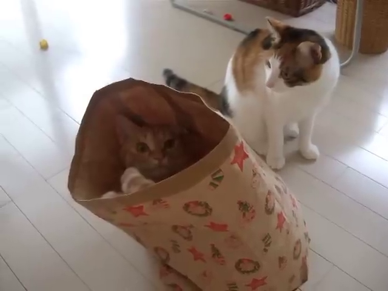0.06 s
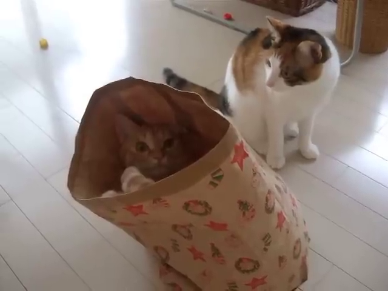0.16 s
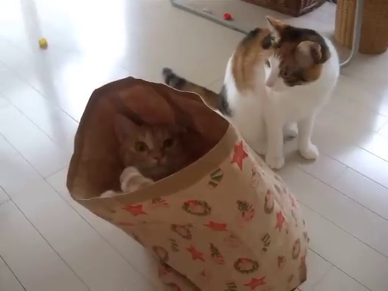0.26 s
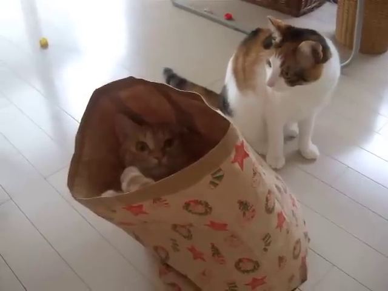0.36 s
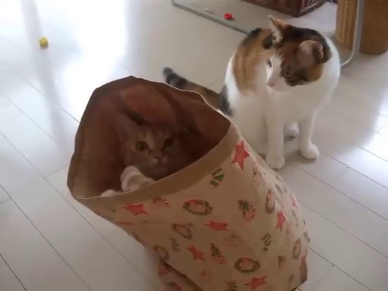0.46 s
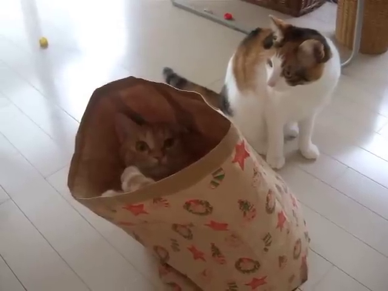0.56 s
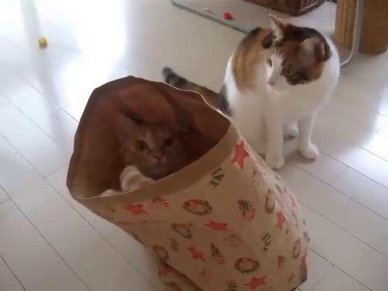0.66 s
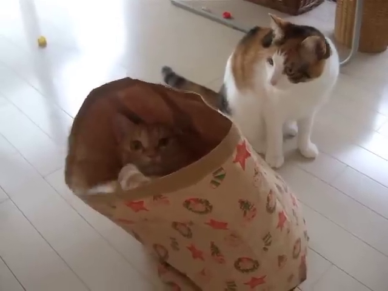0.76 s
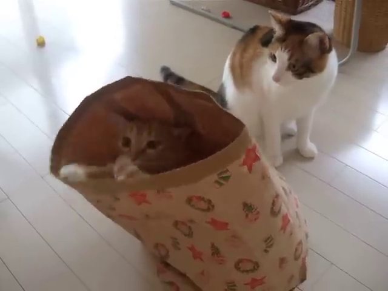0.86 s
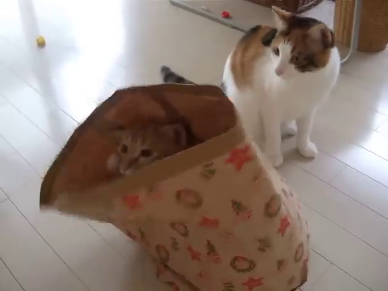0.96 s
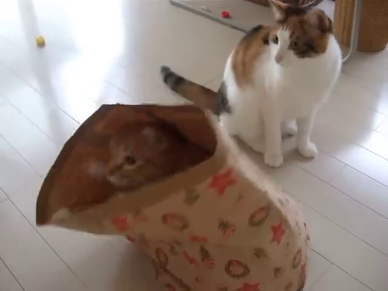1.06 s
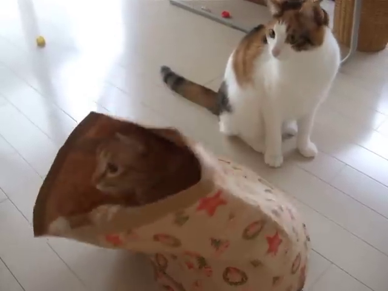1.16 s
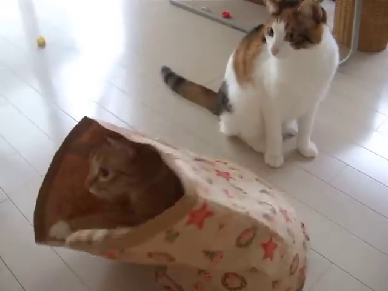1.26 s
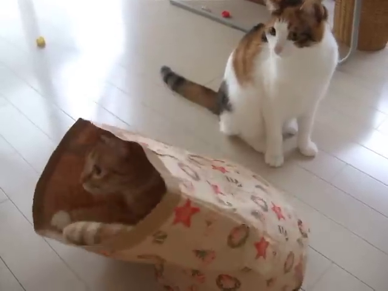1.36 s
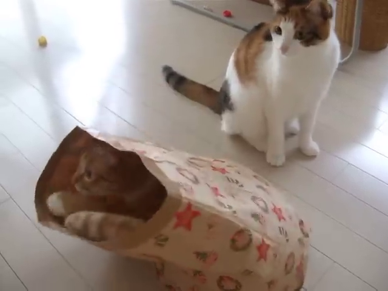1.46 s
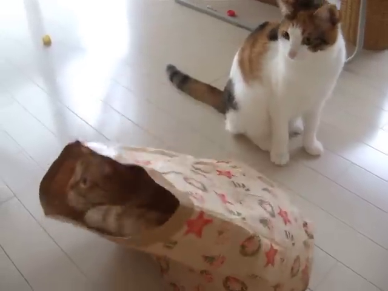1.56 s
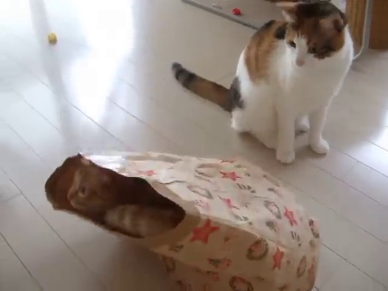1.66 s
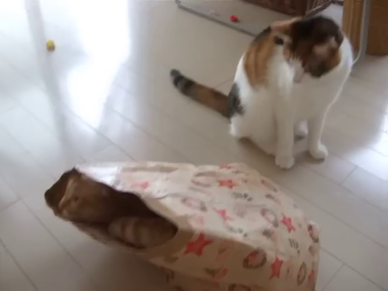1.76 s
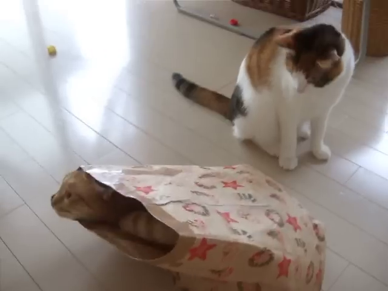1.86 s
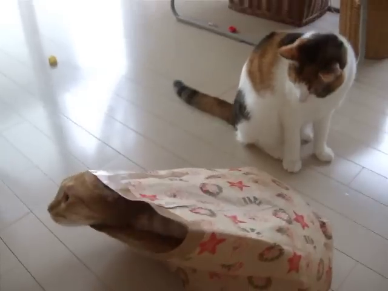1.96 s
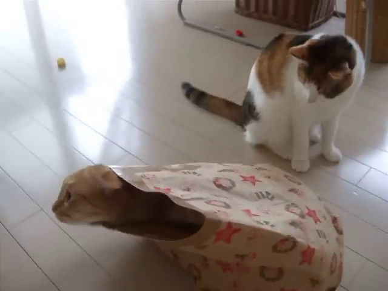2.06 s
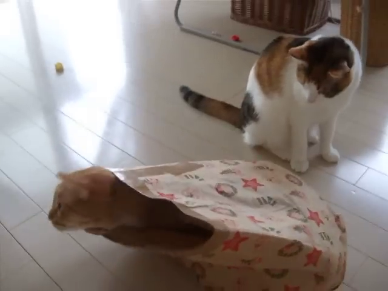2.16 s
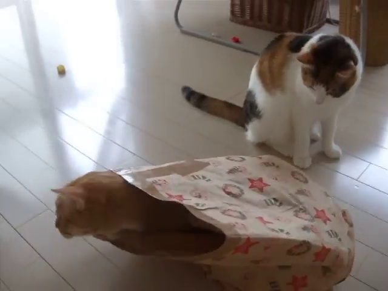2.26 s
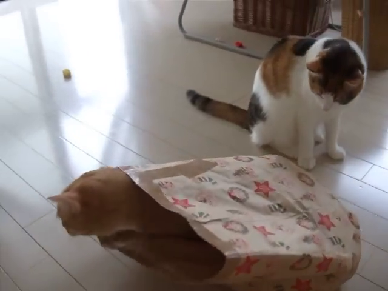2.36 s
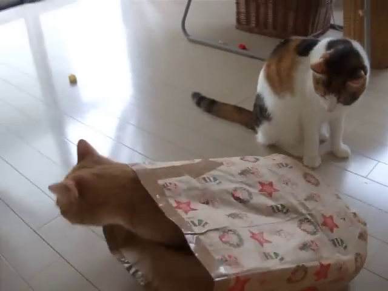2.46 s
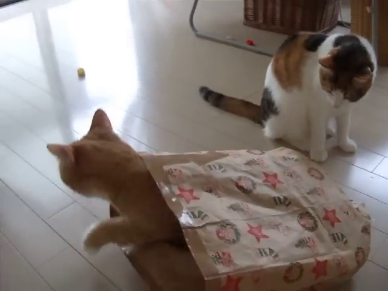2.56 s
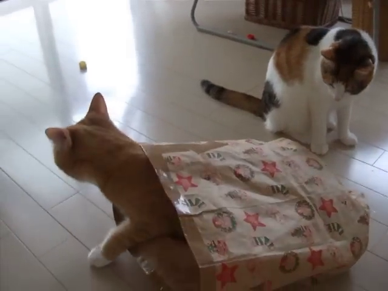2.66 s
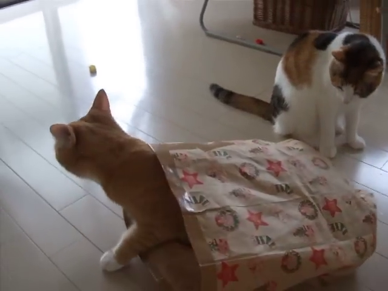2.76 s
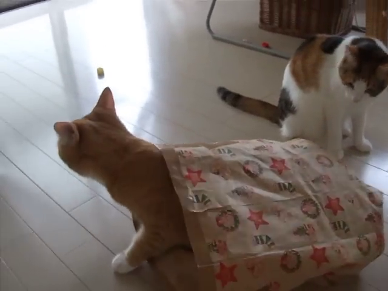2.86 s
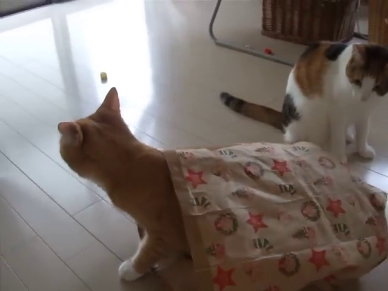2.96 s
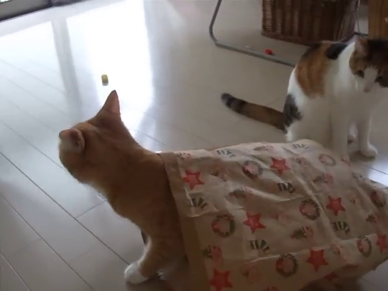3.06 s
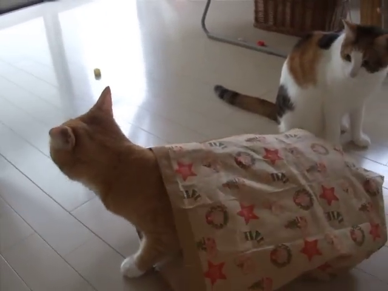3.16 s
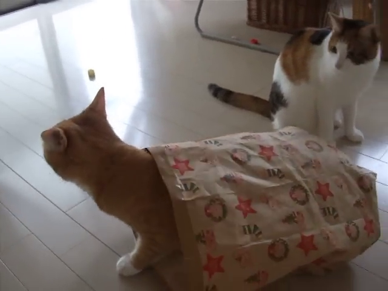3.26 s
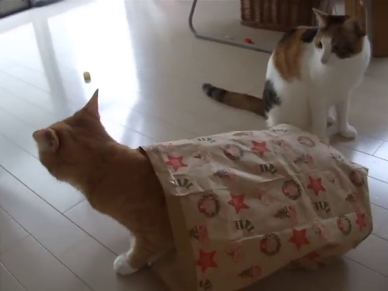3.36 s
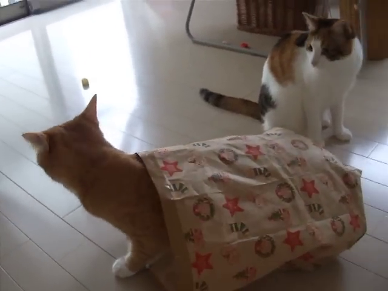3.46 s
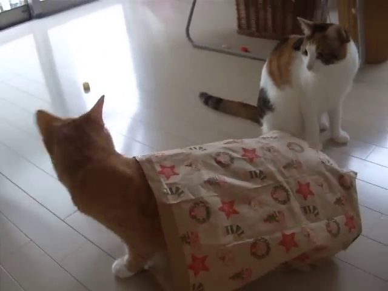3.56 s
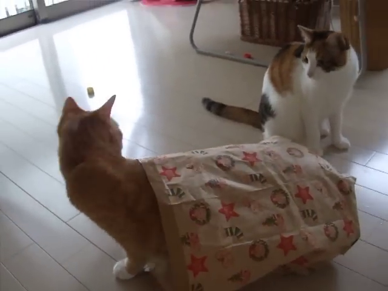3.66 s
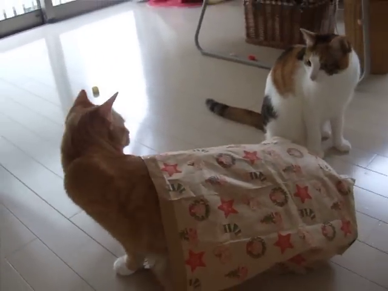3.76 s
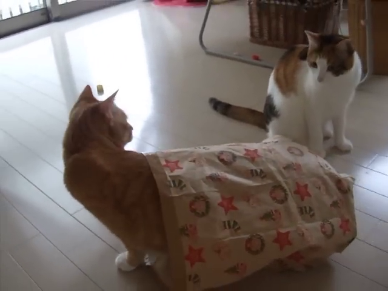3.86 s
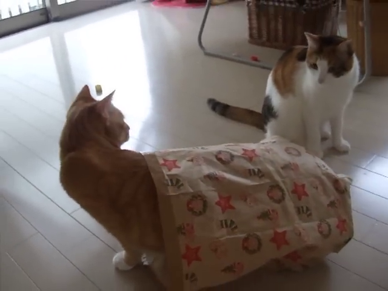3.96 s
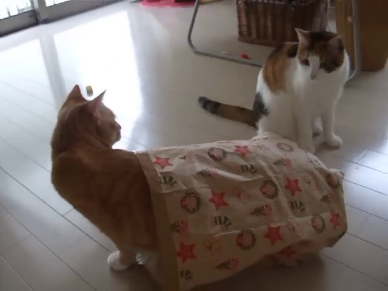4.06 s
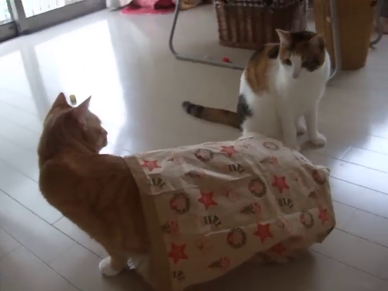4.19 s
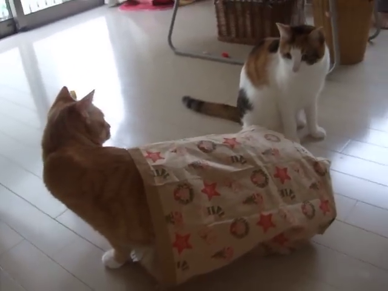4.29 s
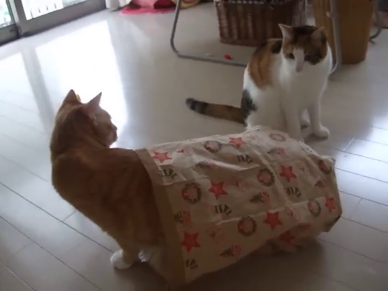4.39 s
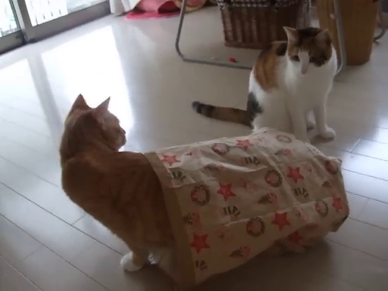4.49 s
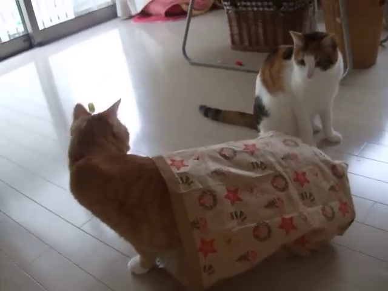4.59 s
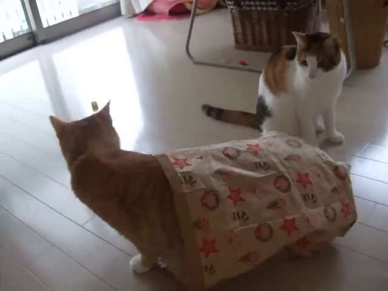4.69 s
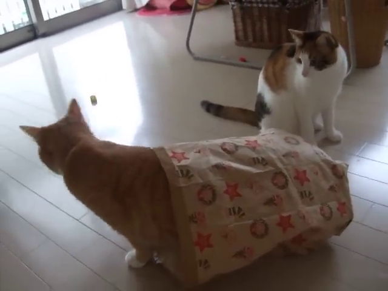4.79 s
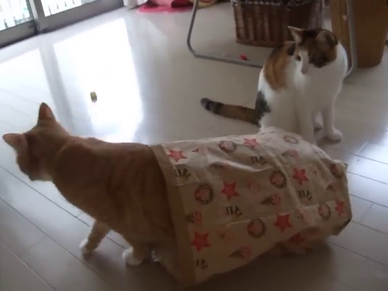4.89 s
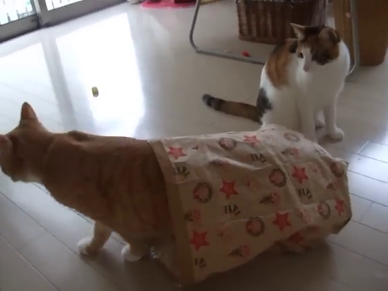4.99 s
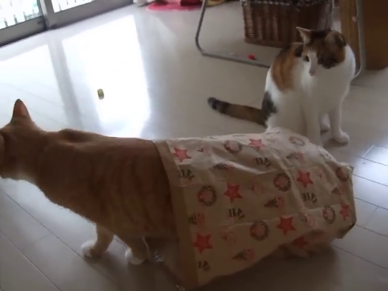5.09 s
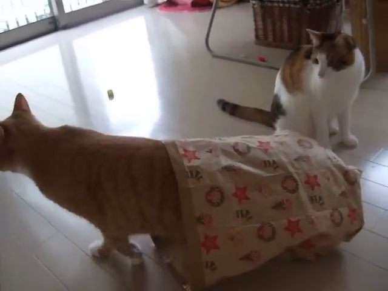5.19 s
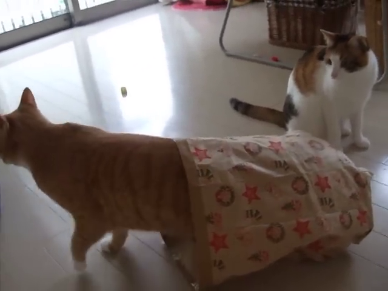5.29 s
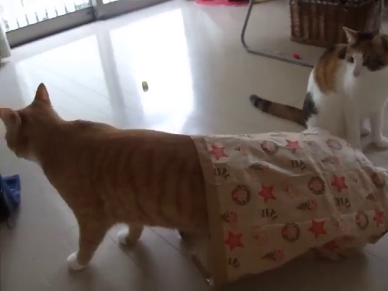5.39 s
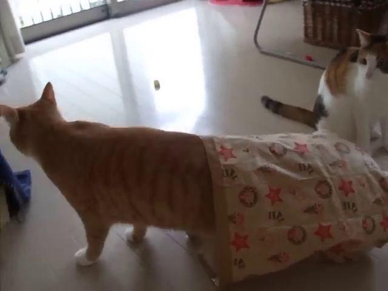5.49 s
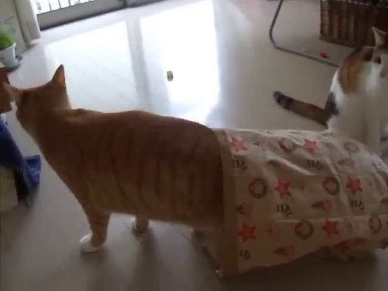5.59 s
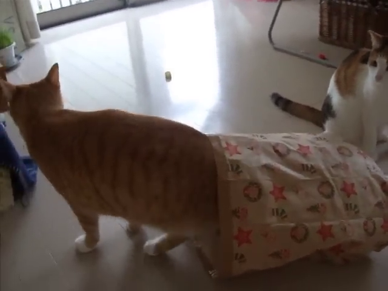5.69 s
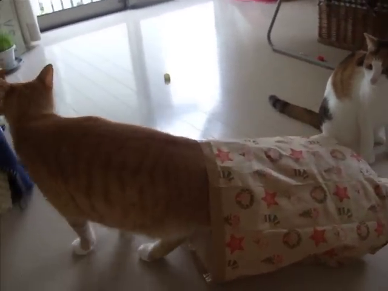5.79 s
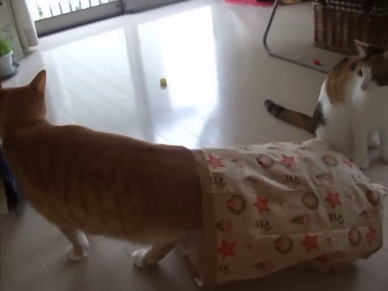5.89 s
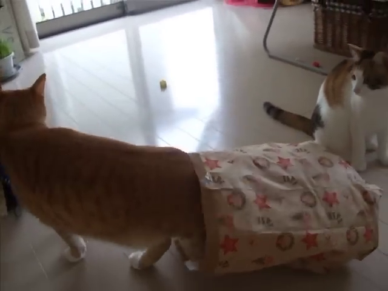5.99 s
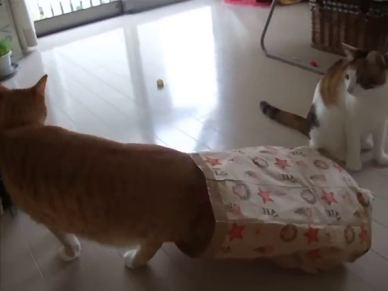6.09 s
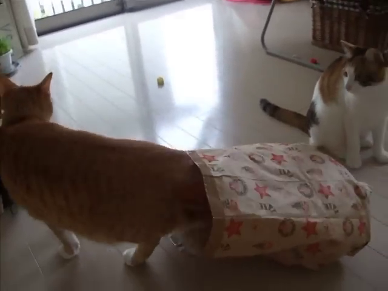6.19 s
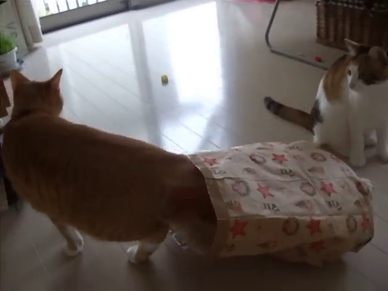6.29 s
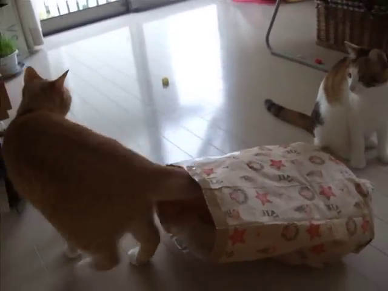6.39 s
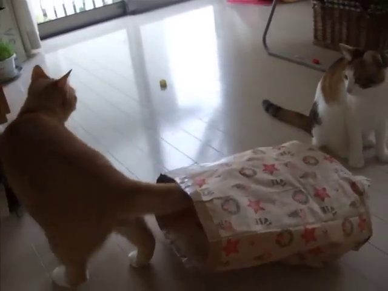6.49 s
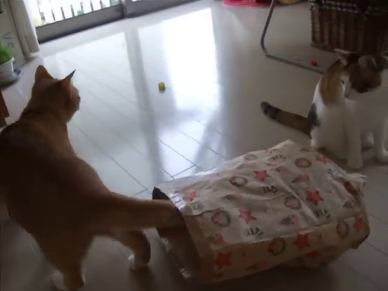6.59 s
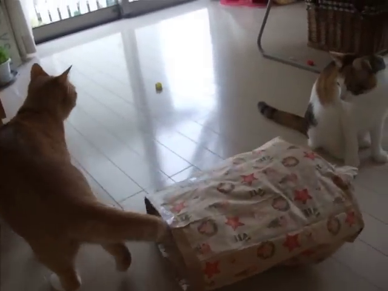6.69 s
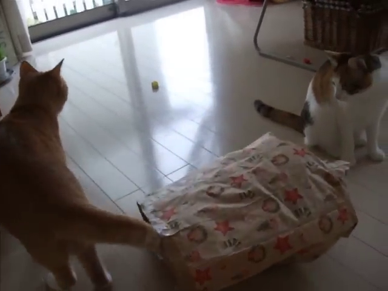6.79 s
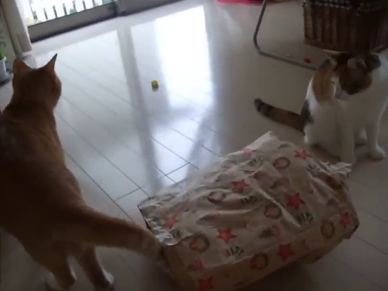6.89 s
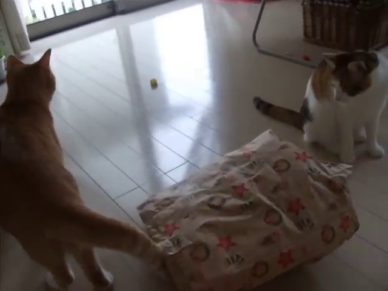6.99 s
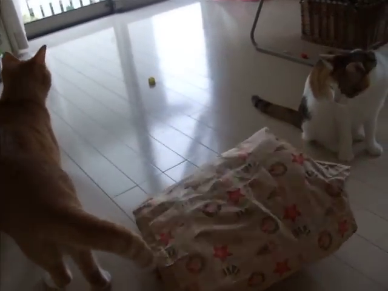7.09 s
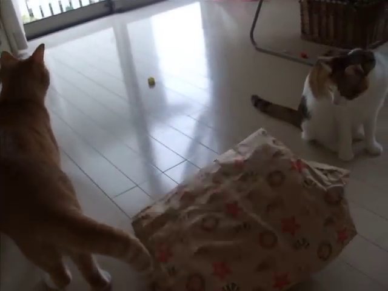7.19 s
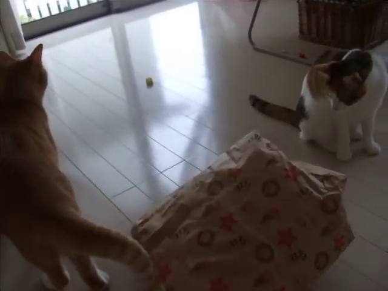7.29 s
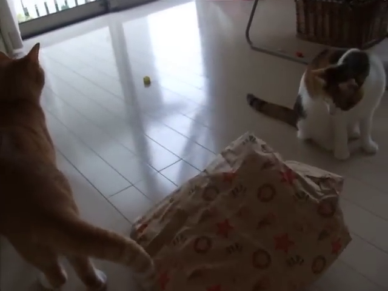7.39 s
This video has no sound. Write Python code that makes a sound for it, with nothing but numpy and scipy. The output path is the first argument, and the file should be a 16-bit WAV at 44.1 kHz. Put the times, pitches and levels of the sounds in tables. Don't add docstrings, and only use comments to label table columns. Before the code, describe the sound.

Loud crisp paper crinkling bursts out in a quiet gritty-hissing room, thins to sparse pats and a landing thump, and ends with small mechanical clicks.

```python
import sys
import numpy as np
from scipy import signal
from scipy.fft import rfft, irfft, next_fast_len
from scipy.io import wavfile
from scipy.ndimage import uniform_filter1d

SR = 44100
rng = np.random.default_rng(int(sys.argv[2]) if len(sys.argv) > 2 else 0)


def magnitude_from_level(level_db):
    exponent = np.asarray(level_db, float) / 20
    return 10 ** exponent


def pcm_store(signal):
    levels = np.round(np.clip(np.atleast_2d(signal), -1, 1) * 32767)
    wavfile.write(sys.argv[1], SR, levels.astype(np.int16).T)


N = 328358
TIME = np.arange(N) / SR


def rms_one(x):
    return x / np.sqrt(np.mean(x ** 2) + 1e-20)


def band(x, low_hz, high_hz, order=2):
    return signal.sosfilt(signal.butter(order, [low_hz, high_hz], "band", fs=SR, output="sos"), x)


def in_time(rows, outside=-120):
    s, *columns = np.transpose(rows)
    return [np.interp(TIME, s, column, outside, outside) for column in columns]


def on_grid(points, size):
    table_hz, values = np.transpose(points)
    hz = np.maximum(np.arange(size // 2 + 1) * SR / size, 1)
    return np.interp(np.log(hz), np.log(table_hz), values)


def colour(x, spectrum):
    cepstrum = irfft(np.log(magnitude_from_level(on_grid(spectrum, size=8192))))
    cepstrum[1:4096] *= 2
    cepstrum[4097:] = 0
    response = irfft(np.exp(rfft(cepstrum)))
    return rms_one(signal.fftconvolve(x, response)[:len(x)])


def ring(x, hz, t60):
    r = magnitude_from_level(-60 / (t60 * SR))
    w = 2 * np.pi * hz / SR
    return signal.lfilter([0, np.sin(w)], [1, -2 * r * np.cos(w), r * r], x + 1e-18)


def add(out, s, sound, db, order=np.inf):
    i = round(s * SR)
    scaled = magnitude_from_level(db) * sound / np.linalg.norm(sound, order)
    out[i:i + len(sound)] += scaled[:N - i]


def burst(noise, decay_s, rise_s=0.00031):
    t = np.arange(len(noise)) / SR
    return noise * (1 - np.exp(-t / rise_s)) ** 2 * np.exp(-t / decay_s)


def swells(times, peaks_db, rise_db_s, fall_db_s):
    ticks = np.arange(0, N, 64)
    late = ticks / SR - np.array(times)[:, None]
    db = np.array(peaks_db)[:, None] + np.minimum(rise_db_s * late, -fall_db_s * late)
    gain = np.sqrt((magnitude_from_level(db) ** 2).sum(axis=0))
    return np.interp(np.arange(N), ticks, gain)


def grains(per_s, spread_db, clump_db):
    clumps = rms_one(signal.lfilter([1], [1, -1.99, .990025], rng.standard_normal(N)))
    born = rng.random(N) < per_s * magnitude_from_level(clump_db * clumps) / SR
    size = magnitude_from_level(spread_db * np.minimum(rng.exponential(1, N), 4))
    return born * size * rng.choice([-1, 1], N)


# frequency in Hz, level in dB.
ROOM_AIR = [(25, -7), (50, -1.5), (90, -6.5), (130, -6.5), (220, -12.5), (500, -11), (1000, -13),
            (2500, -25), (8000, -31.5)]
# time in seconds, rumble in dB.
FOOTFALLS = [
    (0.43, -65),
    (1.43, -68),
    (2.53, -52),
    (3.25, -59.5),
    (4.269, -57),
    (5.1, -61),
    (5.781, -55.5),
    (6.301, -57),
    (6.751, -59.5),
]
# frequency in Hz, level in dB.
STEADY = [(694, -76), (1927, -78.5), (7860, -70), (7887, -71)]
# frequency in Hz, level in dB.
HUM = [(120, -68), (347, -75.5), (462, -76.5), (576, -71)]


def background():
    white = rng.standard_normal((3, N))
    air = magnitude_from_level(-62.0) * colour(white[0], ROOM_AIR)
    footfalls = swells(*np.transpose(FOOTFALLS), rise_db_s=80, fall_db_s=36.5)
    load = np.hypot(magnitude_from_level(-70), footfalls)
    floor = rms_one(ring(white[1], 52, .35) + .6 * ring(white[1], 95, 0.085))
    boards = magnitude_from_level(-3.0) * load * floor
    hiss = magnitude_from_level(-56) * white[2]
    lines = sum(magnitude_from_level(db - 2.5) * np.sin(2 * np.pi * hz * TIME) for hz, db in STEADY)
    hum = sum(magnitude_from_level(db + 0.5) * np.sin(2 * np.pi * hz * TIME) for hz, db in HUM) * np.exp(-TIME / 1.2)
    return hum + air + boards + hiss + lines


# frequency in Hz, level in dB per Hz.
HOLLOW = [(59, -43.5), (100, -26.5), (155, -14.5), (189, -14), (291, -7.5), (538, -11.5), (896, 4),
          (1310, -5), (1600, -5), (2080, -37), (3520, -120)]
# frequency in Hz, level in dB per Hz.
BRIGHT = [(1000, -16), (1600, -9), (2600, -4), (4000, -4.5), (6000, -2), (7500, 0), (9000, -8)]
# time in seconds, level in dB.
RUBBING = [(0.768, -46.5), (0.87, -45.5), (1.25, -43), (1.5, -44), (1.9, -45.5), (2.14, -39), (2.5, -48),
           (2.6, -50), (3.0, -49), (3.2, -54), (3.5, -57)]
# time in seconds, paper dragged along in dB, scuffle on the floor in dB.
LURCHES = [(1.029, -46, -35.5), (1.251, -32.5, -52.5), (1.46, -45, -47), (1.71, -49, -49),
           (1.921, -28.5, -41.5), (2.379, -34.5, -37), (2.52, -30, -48), (2.831, -60.5, -48.5),
           (2.92, -62, -51), (3.001, -40, -42), (3.33, -46.5, -60.5)]


def rustle():
    rub = magnitude_from_level(in_time(RUBBING)[0])
    s, drag_db, scuffle_db = np.transpose(LURCHES)
    lurch = swells(s, drag_db, rise_db_s=91.5, fall_db_s=161)
    drag = np.hypot(magnitude_from_level(-4.5) * rub, lurch)
    shove = swells(s, scuffle_db, rise_db_s=134, fall_db_s=175)
    hollow = colour(grains(per_s=270, spread_db=4.0, clump_db=6.5), HOLLOW)
    rubbing = colour(grains(per_s=9000, spread_db=2.0, clump_db=1.5), BRIGHT)
    lone_ticks = colour(grains(per_s=140, spread_db=5.0, clump_db=4.5), BRIGHT)
    bright = rubbing + magnitude_from_level(-9.5) * lone_ticks
    scuffle = rms_one(band(grains(per_s=680, spread_db=1.0, clump_db=6.5), 110, 300))
    return magnitude_from_level(-5.0) * drag * hollow + rub * bright + magnitude_from_level(-5.5) * shove * scuffle


# time in seconds, energy
# of the crack in dB, sharpness of its top edge in dB against the crack, energy of the hollow knock in dB.
CRACKS = [(0.773, -24.5, -8.5, -28.5), (0.92, -18, 5, -9), (0.934, -2.5, -6, -6.5),
          (0.947, 5, 0, -2.5), (0.96, -2, -22, -4), (0.983, 4.5, 1.5, -1), (0.993, -8, 10.5, -5.5),
          (1.027, -5, -18, 2), (1.159, -16.5, 0, -15.5), (1.183, -3, 4, -8.5),
          (1.221, -0.5, -3, -10), (1.23, -12.5, 0, -11.5), (1.321, -11, -12, -11.5),
          (1.357, -7, 7, -9), (1.401, -6, 1.5, -10.5), (1.544, -5, 0, -12), (1.571, -28.5, 11, -22),
          (1.609, -9.5, -33, -11), (1.699, -10.5, 10, -3), (1.708, -9, -7, -14),
          (1.821, -4.5, -4.5, -9), (1.88, -14, 3.5, -4.5), (1.889, -3.5, 1.5, -3),
          (1.93, -7.5, -6.5, -3), (1.945, 2, -2, -1.5), (1.96, -6, 4.5, -2.5),
          (2.002, -12.5, -14, -5), (2.016, -4, 0, -3.5), (2.185, -15, 9, -16), (2.212, -9, -6, -20),
          (2.262, -19.5, 15.5, -5.5), (2.273, -21, -3, -14), (2.285, -1.5, -14, -15),
                   (2.297, -2, 5.5, -4.5), (2.328, 1, -4, -4.5), (2.359, -14, -16, -11.5),
                   (2.384, 2, -3.5, 2), (2.405, 0, -6, -8), (2.417, -15, -14, -19), (2.45, -10, -3, -10),
                   (2.48, -6, -1.5, -21), (2.509, -5, 6.5, -2), (2.516, -4.5, -3, -7.5),
                   (2.548, -3, -0.5, -6.5), (2.594, -21, -18, -31), (2.639, -20.5, -21, -32),
                   (2.67, -11, -4.5, -11), (2.889, -8.5, -7, -8), (2.92, -3, -4, -15),
                   (3.002, -2, -8.5, -3), (3.061, -3.5, 0.5, -6), (3.077, -23, 8.5, -5),
                   (3.325, -14, -15, -13), (4.651, -4.5, -12, -7), (4.745, 3, -7.5, 1),
                   (5.976, -24.5, -13, -29), (6.771, -22.5, -10.5, -23.5), (7.3965, -8, -17, -10)]
# time in seconds, energy in dB, pitch in Hz.
KNOCKS = [(0.788, -19.5, 890), (0.844, -14, 733), (0.894, -15.5, 830), (1.052, -16, 1050),
          (1.067, -10.5, 580), (1.084, -16, 1100), (1.118, -13.5, 1010), (1.135, -6.5, 945),
          (1.148, -5, 820), (1.233, -4.5, 964), (1.247, -9, 900), (1.387, -12, 950), (1.482, -13.5, 970),
          (1.628, -6, 766), (1.729, -3.5, 860), (1.806, -3, 940), (1.916, -0.5, 673), (2.083, -6.5, 848),
          (2.095, -9, 1100), (2.197, -6, 1154), (2.428, -4.5, 376), (2.863, -20.5, 415), (2.92, -5.5, 1234),
          (2.948, -10, 1210), (3.008, -5, 920), (3.135, -12, 865), (3.254, -14.5, 331), (3.354, -21.5, 794),
          (4.171, -19.5, 596), (7.234, -21, 426)]
# time in seconds, pitch in Hz.
BAG_PITCH = [(0.8, 802), (2.0, 900), (2.5, 1019), (3.3, 887), (4.8, 1049), (6.7, 440)]


def creases():
    cracks = CRACKS
    scatter = np.exp(0.1 * rng.standard_normal(len(cracks)))
    pitch = np.interp([row[0] for row in cracks], *np.transpose(BAG_PITCH)) * scatter
    sharp_ones = [(s, knock, hz, crack, sharp) for (s, crack, sharp, knock), hz in zip(cracks, pitch)]
    dull_ones = [(s, db, hz, db - 13.5, -9) for s, db, hz in KNOCKS]
    return sharp_ones + dull_ones


def snaps():
    direct, rows, length = np.zeros(N), creases(), 1100
    flat, t = np.ones(length), np.arange(length) / SR
    crack_shape = burst(flat, .0005, rise_s=0.00045) + .25 * burst(flat, 0.003)
    air_puff = 2.3 * burst(flat, 0.00011, rise_s=.0001)
    noises = rng.standard_normal((len(rows), 3, length))
    for (s, hollow_db, hollow_hz, middle_db, sharp_db), noise in zip(rows, noises):
        middle = band(crack_shape * noise[0], 1500, 3500)
        top = band(crack_shape * noise[1], 3600, 8500)
        push = burst(noise[2], 0.0023, rise_s=0.0011)
        tone = burst(1.3 * np.cos(2 * np.pi * hollow_hz * t), .0015, rise_s=0.00068)
        kick = band(push + tone, .5 * hollow_hz, 2 * hollow_hz)
        hollow = rms_one(ring(kick, hollow_hz, 14.0 / hollow_hz))
        knock = hollow + .75 * rms_one(band(push + air_puff, 340, 1250))
        add(direct, s, middle, middle_db, order=2)
        add(direct, s, top, middle_db + sharp_db, order=2)
        add(direct, s - .0005, knock, hollow_db, order=2)
    thrown = magnitude_from_level(-0.5) * direct
    return direct, thrown


# frequency in Hz, t60 in seconds, strength in dB.
ROOM_T60 = [(98, 0.46, -3), (392, .45, 2.5), (900, 0.33, 1.5), (1500, 0.33, 0), (2340, 0.39, 0),
            (5100, .36, -1.5), (7700, 0.32, -5.5)]


def room(x):
    out, white = np.zeros(N), rng.standard_normal((2, N))
    lag = round(.008 * SR)
    edges = 110 * 2 ** np.arange(0, 6.4, 1 / 3)
    hz, *columns = np.transpose(ROOM_T60)
    for k, (low, high) in enumerate(zip(edges, edges[1:])):
        log_centre = np.log(low * high) / 2
        t60, db = (np.interp(log_centre, np.log(hz), column) for column in columns)
        kept = magnitude_from_level(-120 / (t60 * SR))
        energy = uniform_filter1d(band(x, low, high) ** 2, size=400)
        stored = signal.lfilter([1 - kept], [1, -kept], energy)
        field = np.sqrt(np.abs(stored)) * rms_one(band(white[k % 2], low, high))
        out[lag:] += magnitude_from_level(db) * field[:-lag]
    return out


# time in seconds, peak in dB.
THUDS = [
    (0.982, -47.5),
    (1.929, -48),
    (2.382, -56),
    (3.246, -44.5),
    (4.164, -38),
    (4.177, -33),
    (7.035, -55),
]
# frequency in Hz, level in dB, t60 in seconds.
BOARDS = [(50.1, 1.5, 0.62), (82.7, 0, 0.15), (138.5, -15.5, 0.46)]
# time in seconds, peak in dB, pitch in Hz.
PATS = [(1.454, -38.5, 675), (3.566, -38.5, 550), (3.598, -46.5, 582), (3.858, -37.5, 880),
        (3.917, -38, 568), (4.477, -36, 720), (4.994, -45.5, 420), (5.562, -43.5, 444), (5.698, -43, 810),
        (6.032, -33, 459), (6.113, -55, 426), (6.34, -40.5, 293), (6.515, -45, 395), (6.764, -41.5, 900),
        (7.233, -36, 1407), (7.399, -30, 900), (7.4, -27, 1495), (4.18, -38, 234.4), (7.428, -43, 435)]


def paws():
    pats, pushes, length = np.zeros(N), np.zeros(N), 1800
    t = np.arange(length) / SR
    for (s, db, hz), noise in zip(PATS, rng.standard_normal((len(PATS), length))):
        thump = noise + 0.37 * np.cos(2 * np.pi * hz * t)
        push = band(burst(thump, 0.0021, rise_s=.001), 0.41 * hz, 2.2 * hz)
        tick = band(burst(1 + noise, .0003, rise_s=.0002), .4 * hz, 3.0 * hz)
        damped = rms_one(ring(push, hz, 7.6 / hz))
        add(pats, s + .0015, damped + 0.95 * rms_one(push) + 0.66 * rms_one(tick), db)
    for s, db in THUDS:
        add(pushes, s, np.hanning(180), db - 42.5)
    thuds = sum(magnitude_from_level(db) * ring(pushes, hz, t60) for hz, db, t60 in BOARDS)
    return pats, thuds


# time in seconds, peak in dB, pitch in Hz, t60 in seconds.
LENS = [
    (6.9945, -27, 2960, .035),
    (7.0025, -27, 2400, .02),
    (7.0078, -16, 2750, .03),
    (7.0122, -18, 2960, .025),
    (7.0185, -24, 2750, .04),
    (7.0328, -21, 2790, .03),
    (7.0335, -33, 2300, .02),
    (7.048, -42, 2720, .03),
]
# time in seconds, level in dB.
LENS_SLIDE = [(6.998, -55), (7.004, -32), (7.012, -27), (7.021, -30), (7.028, -44), (7.033, -60)]
# frequency in Hz, level in dB, t60 in seconds.
LENS_MODES = [(1240, 3.5, 0.029), (900, -4.5, 0.029), (1500, -0.5, 0.0051), (1795, 3, 0.0037),
              (2300, 10.5, 0.02), (2700, -3.5, 0.026), (7070, 12, 0.0024)]
# time in seconds, level in dB.
WHINE = [(7.03, -57), (7.15, -60.5), (7.235, -58.5)]


def lens():
    latches = np.zeros(N)
    click = np.r_[np.hanning(70), np.zeros(2000)]
    t = np.arange(len(click)) / SR
    for s, db, hz, t60 in LENS:
        add(latches, s, ring(click * np.cos(2 * np.pi * hz * t), hz, t60), db)
    slide = magnitude_from_level(in_time(LENS_SLIDE)[0]) * rng.standard_normal(N)
    housing = magnitude_from_level(-27) * sum(magnitude_from_level(db) * ring(slide, hz, t60) for hz, db, t60 in LENS_MODES)
    gears = band(housing + 1.22 * slide, 740, 6900)
    partials = [(684, 1), (1771, 0.17), (2643, 0.38), (2433, 0.25)]   # (Hz, height)
    whine = sum(height * np.sin(2 * np.pi * hz * TIME) for hz, height in partials)
    return latches + gears + magnitude_from_level(in_time(WHINE)[0]) * whine


def scene():
    pats, thuds = paws()
    direct, thrown = snaps()
    soft = rustle()
    walls = magnitude_from_level(-5.5) * room(thrown + soft + magnitude_from_level(-4) * pats)
    air = background() + soft + direct + walls + pats + thuds + lens()
    return signal.sosfilt(signal.butter(2, 40, "high", fs=SR, output="sos"), air)[None]


def low_pass(x):
    return signal.sosfilt(signal.butter(12, 9310, fs=SR, output="sos"), x)


def record(dry):
    converter_hz, step = 16000, 1 / 128 / np.sqrt(2)
    rounded = 1.4 * np.tanh(dry[0] / 1.4)
    coarse = signal.resample_poly(rounded, 160, 441)
    steps = step * np.floor(coarse / step + .08)
    size = next_fast_len(len(steps) // 160 + 2) * 160
    low = rfft(steps, size)
    spectrum = np.concatenate([low, np.conj(low[-2:0:-1])])
    hz = np.arange(len(spectrum)) * converter_hz / size
    leak_db = np.interp(hz, [8140, 7970, 8486, 9220, 10000, 13000], [0.12, -2.0, -13, -48, -54, -86])
    wet = irfft(spectrum * magnitude_from_level(leak_db), size * 441 // 160)[:N] * SR / converter_hz
    return low_pass(wet[None])


dry = scene()
out = record(dry)
pcm_store(out)
```